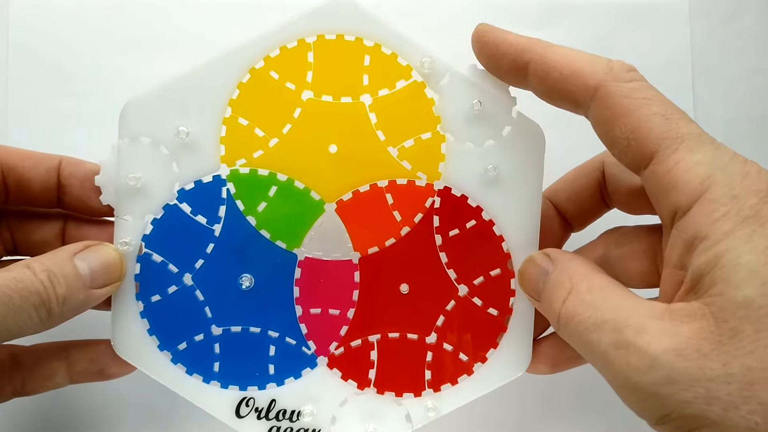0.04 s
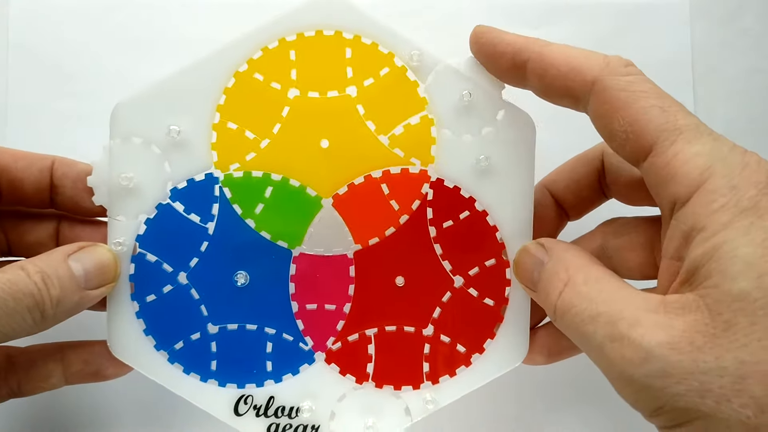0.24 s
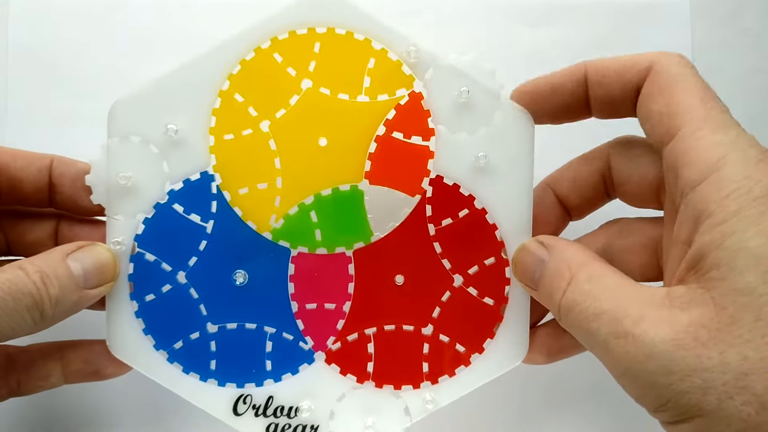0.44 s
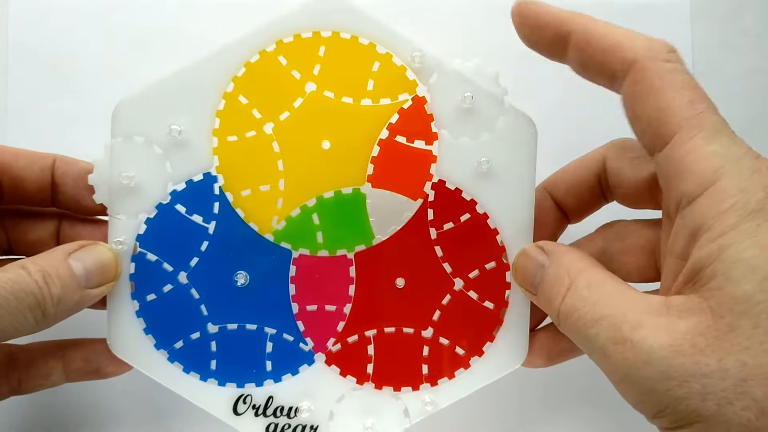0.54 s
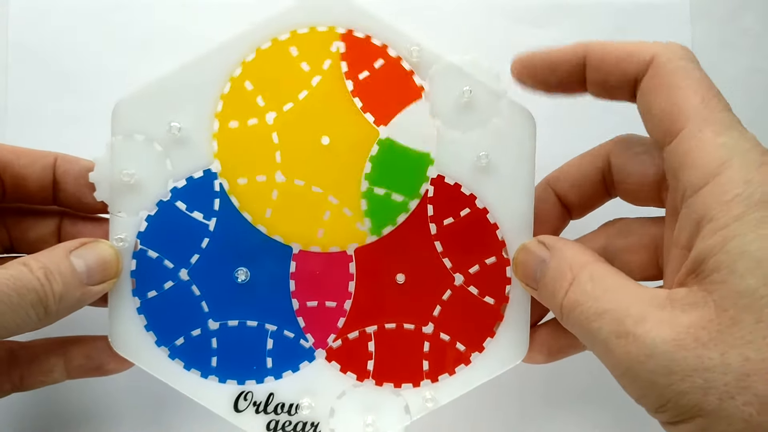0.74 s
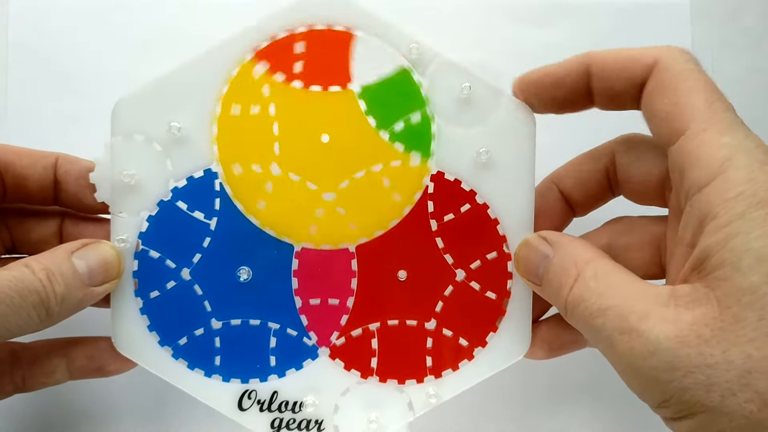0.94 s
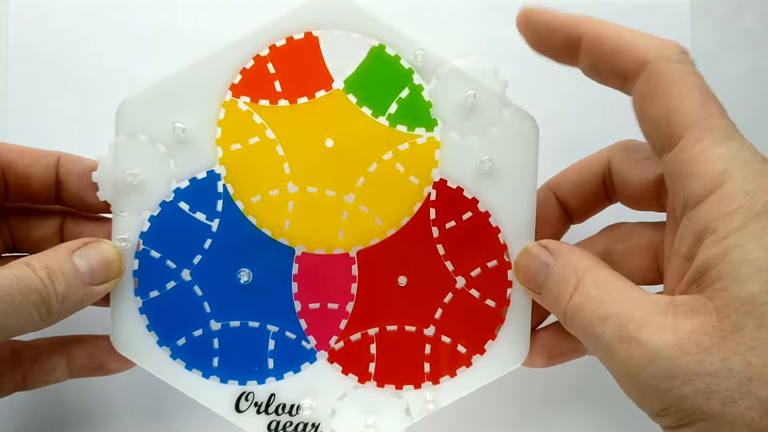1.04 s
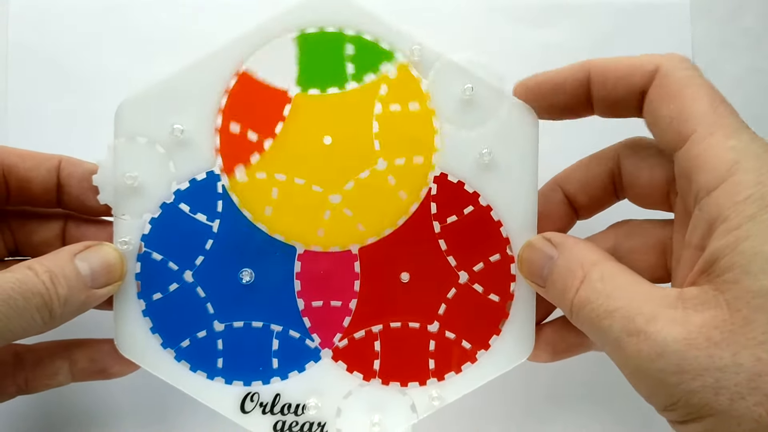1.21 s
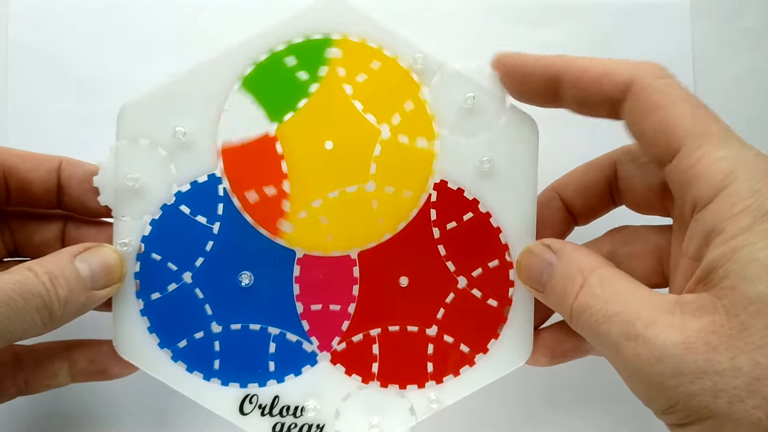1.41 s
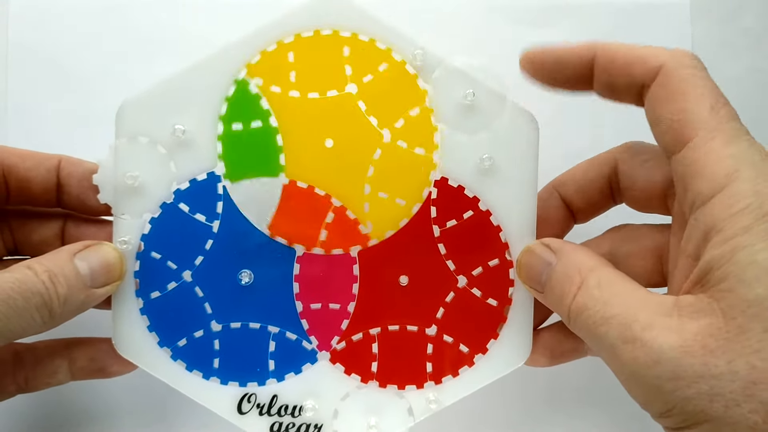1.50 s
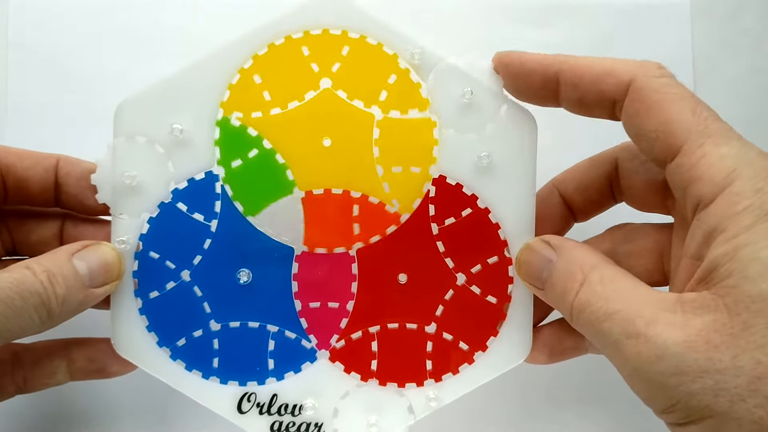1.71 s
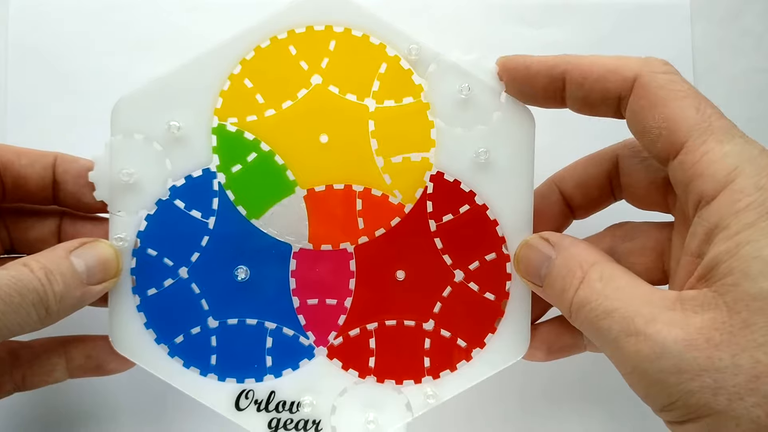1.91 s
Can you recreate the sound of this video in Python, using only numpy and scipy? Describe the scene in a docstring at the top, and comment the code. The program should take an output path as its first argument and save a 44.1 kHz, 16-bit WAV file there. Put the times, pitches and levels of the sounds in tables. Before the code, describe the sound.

A plastic gear puzzle clicks and rasps as hands turn its disc in five quick pushes, the tiles scraping and clacking together. A few soft taps follow. It is heard close up in a quiet room with a faint hum.

```python
"""Turning a geared plastic puzzle

Two hands turn a geared disc, close up in a quiet, humming room. Five pushes rasp the tiles round
their track and knock them together; the last four open with a snap as the gear teeth mesh.
A gentle nudge and a few soft taps line the tiles up. Every contact rings the hollow case."""
import sys
import numpy as np
from scipy import signal
from scipy.fft import rfft, irfft
from scipy.io import wavfile

SR = 44100
rng = np.random.default_rng(int(sys.argv[2]) if len(sys.argv) > 2 else 0)


def dump_mix(stems):
    """Bounce the given channels to the path in sys.argv[1] as a 16-bit WAV at rate SR."""
    frames = np.atleast_2d(stems).T  # one column per channel
    limited = np.clip(frames, -1, 1)  # hard clip at full scale
    pcm = np.round(limited * 32767).astype(np.int16)
    wavfile.write(sys.argv[1], SR, pcm)


N = 85995
TIME, FREQS = np.arange(N) / SR, np.fft.rfftfreq(N, 1 / SR)


def amp(db):
    return 10 ** (np.asarray(db) / 20)


def unit_rms(x):
    return x / np.sqrt(np.mean(x ** 2) + 1e-20)


def curve_at(points, hz):
    """Read a curve along a log-frequency axis."""
    f, value = np.transpose(points)
    return np.interp(np.log(hz + 1), np.log(f + 1), value)


def drift(hz):
    """Random wander up to about the given rate."""
    return unit_rms(irfft(rfft(rng.standard_normal(N)) / (1 + (FREQS / hz) ** 4), N))


def treble(hz, corner_hz=6000):
    """High-shelf shape, rising from 0 to 1."""
    return 1 / (1 + (corner_hz / (hz + 1)) ** 3)


BODY_FREQS = abs(np.fft.fftfreq(2048, 1 / SR))
def through_plastic(x, eq_db):
    """The plastic colours a sound: a minimum-phase, unit-energy EQ given at BODY_FREQS."""
    log_gain = np.log(amp(eq_db))
    impulse = np.fft.ifft(np.exp(np.conj(signal.hilbert(log_gain)))).real
    return signal.fftconvolve(x, impulse[None] / np.linalg.norm(impulse), axes=1)


def clicks(cues, eq, gain_db=0, attack_s=0.000082, ring_octaves=0.09):
    """Each contact is a fast-dying chatter through the plastic, with its own shelf and ringing peak."""
    track, t = np.zeros((2, N)), TIME[:2048]
    for start_s, level_db, treble_db, decay_s, ring_hz, ring_db in cues:
        envelope = (1 - np.exp(-t / attack_s)) * np.exp(-t / decay_s)
        chatter = rng.standard_normal((2, len(t))) * envelope
        for _ in range(2):  # flatten the spectrum, keep the transient tight
            flat = irfft(np.exp(1j * np.angle(rfft(chatter))))
            chatter = flat * np.minimum(envelope * 2, 1)
        chatter *= np.linalg.norm(envelope) / np.linalg.norm(chatter, axis=1, keepdims=True)
        peak_db = ring_db / (1 + (np.log2((BODY_FREQS + 1) / ring_hz) / ring_octaves) ** 2)
        eq_db = curve_at(eq, BODY_FREQS) + treble_db * treble(BODY_FREQS) + peak_db
        click = amp(level_db + gain_db) * through_plastic(chatter, eq_db)
        start = round(start_s * SR)
        track[:, start:start + click.shape[1]] += click[:, :N - start]
    return track


# Noise bed spectrum: f/Hz, relative level/dB
ROOM_TONE_EQ = [(28, -22), (48, 1.5), (100, 1), (130, 7.5), (165, -13.5), (230, -4.5), (330, -17),
                (480, -26), (2400, -23), (6000, -31), (7200, -36), (11000, -26), (16000, -30)]
def room_tone(gain_db=-58):
    """A steady bed of low rumble and faint hiss."""
    noise = irfft(rfft(rng.standard_normal((2, N))) * amp(curve_at(ROOM_TONE_EQ, FREQS)), N)
    return stereo_image(amp(gain_db) * unit_rms(noise))


# Hum fader moves: t/s, relative level/dB
HUM_FADER = [(.04, -13), (.14, 6), (.46, -6.5), (.65, 7), (.85, -3), (.95, 6), (1.15, -21.5), (1.4, 0.5),
             (1.75, -8), (1.9, 3)]
def hum(pitch_hz=138.3, gain_db=-59.5, waver_hz=1.2, waver_db=1.2):
    """A low, wavering tone swells and fades, a little to the right."""
    cycles = np.cumsum(pitch_hz + waver_hz * drift(hz=5.1)) / SR
    level_db = np.interp(TIME, *np.transpose(HUM_FADER)) + waver_db * drift(hz=19)
    return amp(gain_db + level_db) * np.sin(2 * np.pi * cycles) * amp([[-2], [0]])


# Slide envelopes, five pushes and the nudge: t/s, relative level/dB
RASP_ENVELOPES = [
    [(.0, -64), (.035, -56), (.10, -69.5), (.16, -57.5), (.198, -46.5), (.21, -38.5), (.26, -31),
     (.275, -45), (.34, -67)],
    [(.431, -39.5), (.446, -36), (.475, -42.5), (.50, -39), (.52, -29.5), (.57, -39), (.62, -44),
     (.67, -60)],
    [(.690, -38.5), (.705, -34), (.735, -40), (.76, -31.5), (.79, -35.5), (.82, -36), (.845, -44.5),
     (.91, -62.5)],
    [(.949, -37.5), (.962, -33), (.98, -55.5), (1.005, -36.5), (1.022, -28.5), (1.05, -36.5),
     (1.135, -46.5), (1.175, -62)],
    [(1.206, -41.5), (1.218, -36), (1.26, -34), (1.315, -34), (1.425, -63.5)],
    [(1.46, -61), (1.49, -52), (1.515, -55.5), (1.545, -44.5), (1.58, -48.5), (1.615, -69), (1.73, -75),
     (1.78, -54.5), (1.83, -56), (1.88, -72.5)],
]
# Rasp tone: f/Hz, relative level/dB
RASP_EQ = [(550, -28), (800, -19), (1100, -5.5), (1500, -7), (2200, -2), (3400, -1), (5600, -4),
           (8000, -12), (10500, -9), (13000, -13), (16000, -18.5)]
def tile_rasp(grains_per_s=9000, spread_db=1.44, judder_db=2.5, gain_db=-1.5):
    """Tiles stick and slip in their track: a juddering stream of tiny clicks."""
    slides = [np.interp(TIME, *np.transpose(points), left=-100, right=-100) for points in RASP_ENVELOPES]
    level_db = np.max(slides, axis=0)
    slips = rng.random(N) < grains_per_s / SR
    slip_db = spread_db * np.minimum(rng.exponential(1, N), 4) + judder_db * drift(hz=135)
    grains = unit_rms(slips * amp(slip_db) * rng.choice([-1., 1.], (2, N)))
    rasp = through_plastic(grains * amp(level_db + gain_db), curve_at(RASP_EQ, BODY_FREQS))[:, :N]
    fizz = irfft(rfft(rasp) * treble(FREQS), N)
    fizz_db = 0.53 * (level_db + 41)  # the rasp brightens as it gets louder
    return rasp + fizz * (amp(fizz_db) - 1)


# Knock cues: t/s, level/dB, treble/dB, decay/s, ring f/Hz, ring boost/dB
KNOCK_CUES = [(.031, -44, -13.5, 0.007, 3220, 7), (.1802, -35.5, -3, 0.0054, 3570, -4),
              (.2018, -31, -2, 0.014, 2700, -1), (.225, -30, -40, 0.0029, 2820, -18),
              (.2425, -30.5, -33, 0.0079, 2160, 4.5), (.256, -29, 9, 0.013, 2700, -6),
              (.503, -30, -37, 0.0089, 3170, 15), (.5163, -18, 4, 0.0038, 1110, 15.5),
              (.5175, -12.5, 3, 0.0022, 5630, 21.5), (.753, -28.5, -8, 0.0035, 3250, -21),
              (.7563, -17.5, 2, 0.0014, 3500, 16), (.7605, -22, 1, .004, 5100, 11),
              (.8022, -19.5, 7, 0.0069, 4100, 12.5), (.817, -22, 4.5, 0.0031, 3650, 12),
              (1.0032, -23, -7.5, 0.0025, 3600, 11), (1.0101, -27, -19, 0.0018, 3350, 16),
              (1.0204, -13, 5, 0.0033, 4400, 5), (1.2408, -24, 8, 0.0043, 3800, 17),
              (1.2545, -32, -20, 0.0015, 2760, 17), (1.262, -28, -6, 0.0038, 3680, 8),
              (1.2695, -28, -21, 0.0028, 2630, 15), (1.2852, -21.5, 5.5, 0.0049, 2840, 8),
              (1.3063, -21, 26, 0.002, 2720, -12), (1.4645, -48, -47, 0.008, 2430, 18),
              (1.5252, -43.5, -38, 0.0035, 2840, 0), (1.539, -37.5, -19, 0.0063, 2700, 3),
              (1.584, -43, -18, 0.0058, 1990, -1)]
# Knock tone: f/Hz, relative level/dB
KNOCK_EQ = [(250, -23), (550, -35.5), (800, -20), (1100, -5.5), (1600, -5), (2800, -3.5), (4500, -3),
            (8000, -7.5), (10000, -4), (13000, -7.5), (16500, -15.5)]
def tile_knocks():
    """Tiles clack against each other in their track."""
    return clicks(KNOCK_CUES, KNOCK_EQ, gain_db=-0.5)


# Snap cues: t/s, level/dB, treble/dB, decay/s, ring f/Hz, ring boost/dB
SNAP_CUES = [(.4375, -13.5, 6, 0.002, 2680, 5.5), (.697, -12, 2, 0.0012, 3570, 3),
             (.9552, -17, -6.5, 0.0016, 3460, 5), (1.2118, -24, -4, 0.0024, 2750, 10)]
# Snap tone: f/Hz, relative level/dB
SNAP_EQ = [(150, -41), (860, -27), (1130, -2), (1800, -9), (2130, -5.5), (2400, -11.5), (2750, -4.5),
           (3650, -2.5), (4400, -14), (5400, -17.5), (8200, -26.5), (10100, -3.5), (11000, -12.5),
           (12100, -6), (16500, -22.5)]
def gear_snaps():
    """Gear teeth catch with a crisp snap at the start of a push."""
    return clicks(SNAP_CUES, SNAP_EQ)


# Tap cues: t/s, level/dB, treble/dB, decay/s, ring f/Hz, ring boost/dB
TAP_CUES = [(1.6362, -49, -10, 0.0051, 2500, 15.5), (1.7068, -39, -19, 0.0026, 1890, 12),
            (1.769, -41.5, 12, 0.0039, 2960, 18.5), (1.8476, -42, -4, 0.0047, 2600, 5)]
# Tap tone: f/Hz, relative level/dB
TAP_EQ = [(150, -32), (750, -22), (1050, 3), (2100, 4), (3400, 0), (4200, -2), (7000, -12), (10500, -5.5),
          (16000, -20)]
def settling_taps():
    """Soft taps as the tiles settle into line."""
    return clicks(TAP_CUES, TAP_EQ, gain_db=2)


# Case resonances: f/Hz, relative level/dB, t60/s
CASE_MODES = [(1636, -22, 0.116), (2114, -10, 0.017), (2667, -9.5, 0.016), (2796, -17.5, 0.083),
              (3323, -13.5, 0.039), (3522, -17.5, 0.029), (4416, -19.5, 0.08)]
def hollow_case(x, send=0.4):
    """The hollow case rings briefly after every contact."""
    t, ring = TIME[:8192], 0
    for hz, db, t60 in CASE_MODES:
        mode = np.exp(-np.log(1000) * t / t60) * np.cos(2 * np.pi * hz * t)
        ring += amp(db) * mode / np.linalg.norm(mode)
    return x + send * signal.fftconvolve(x, ring[None], axes=1)[:, :N]


# Left channel against right: f/Hz, level/dB
LEFT_EQ = [(60, -12), (160, -3.5), (700, -0.5), (1200, -4.5), (2000, -5.5), (3300, -3), (5500, -1),
           (7000, -2), (9000, -18.5), (15000, -4.5)]
# Likeness of the channels: f/Hz, coherence (0 to 1)
COHERENCE = [(100, 0.62), (1200, 0.57), (3000, 0.18), (14000, .2)]
def stereo_image(pair, left_lag_s=0.00011):
    """Two unrelated signals become left and right: the left is later, duller and partly alike."""
    side, right = rfft(pair)
    shared = curve_at(COHERENCE, FREQS)
    left = shared * right + np.sqrt(1 - shared ** 2) * side
    left *= amp(curve_at(LEFT_EQ, FREQS)) * np.exp(-2j * np.pi * FREQS * left_lag_s)
    return irfft(np.array([left, right]), N)


def small_room(x, wet_db=-13, first_echo_s=0.0015):
    """Nearby walls add a short tail that dies fastest in the mids."""
    hz, t, spectrum = signal.stft(rng.standard_normal((2, 16384)), SR, nperseg=256)
    t60 = curve_at([(300, 0.18), (1500, 0.12), (4000, 0.2), (13000, 0.18)], hz)  # f/Hz, t60/s
    tail = signal.istft(spectrum * np.exp(-np.log(1000) * t / t60[:, None]), SR, nperseg=256)[1]
    tail *= np.arange(tail.shape[1]) > first_echo_s * SR
    return x + amp(wet_db) * signal.fftconvolve(x, tail / np.linalg.norm(tail[0]), axes=1)[:, :N]


def scene():
    """The puzzle sounds through its case into the room, over room tone and hum."""
    contacts = gear_snaps() + tile_knocks() + settling_taps() + tile_rasp()
    puzzle = stereo_image(hollow_case(contacts))
    return small_room(puzzle) + room_tone() + hum()


def record(dry, cutoff_hz=16200):
    """A steep low-pass trims the very top."""
    lowpass = signal.firwin(255, cutoff_hz, window=("kaiser", 8), fs=SR)
    return signal.oaconvolve(dry, lowpass[None], "same")


dry = scene()
out = record(dry)
dump_mix(out)
```